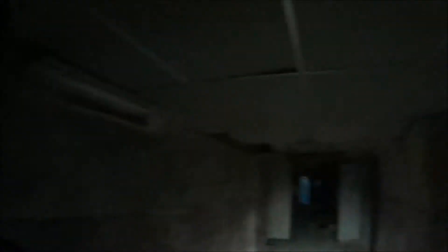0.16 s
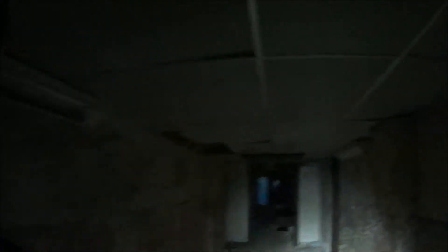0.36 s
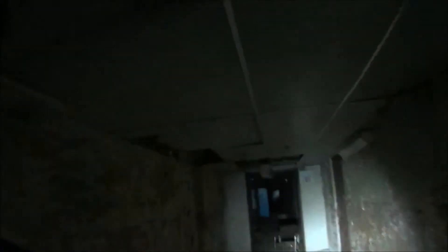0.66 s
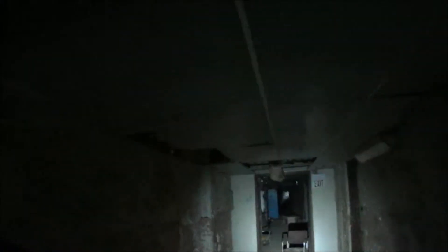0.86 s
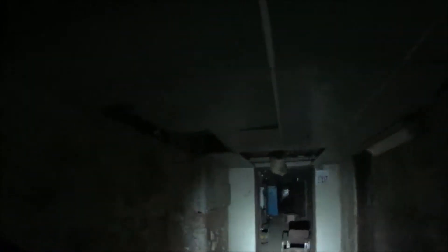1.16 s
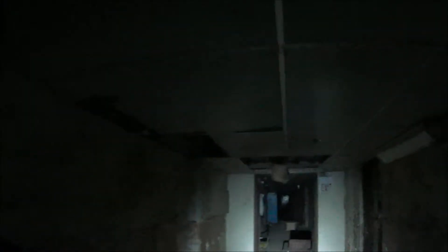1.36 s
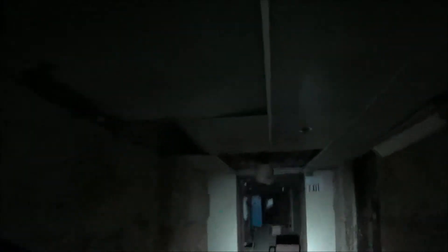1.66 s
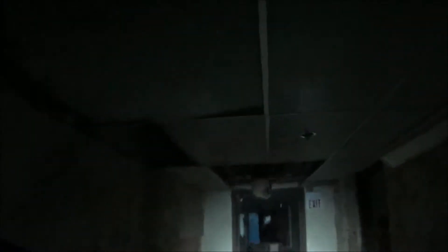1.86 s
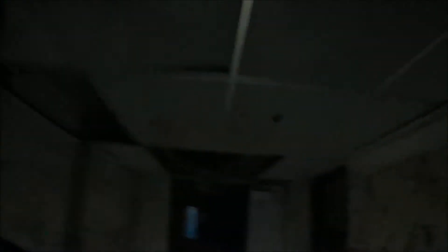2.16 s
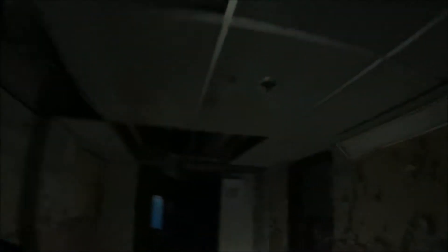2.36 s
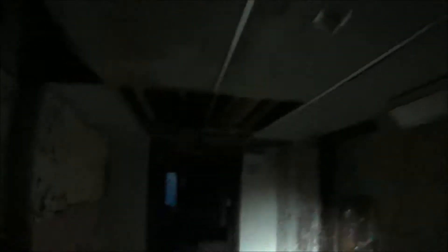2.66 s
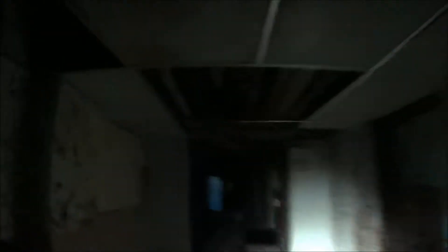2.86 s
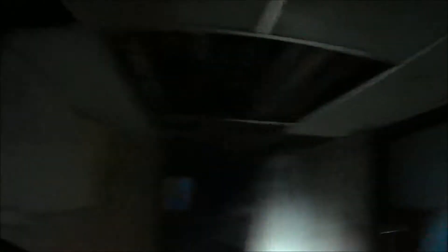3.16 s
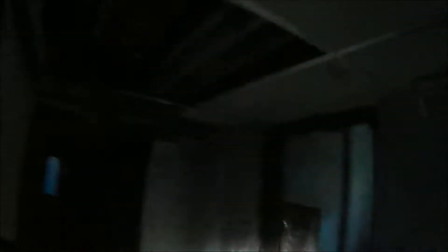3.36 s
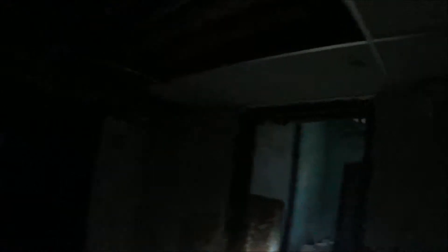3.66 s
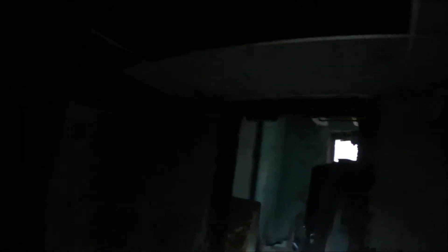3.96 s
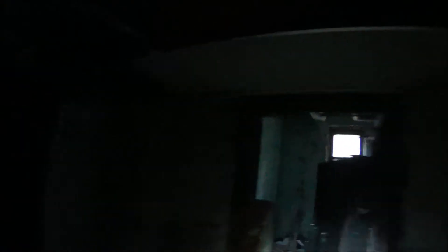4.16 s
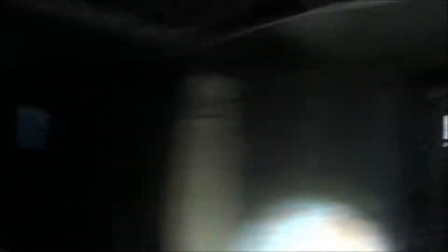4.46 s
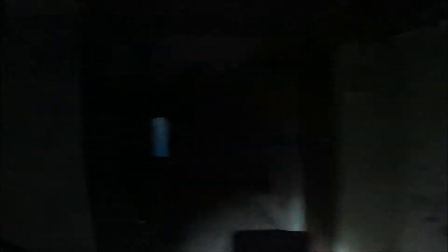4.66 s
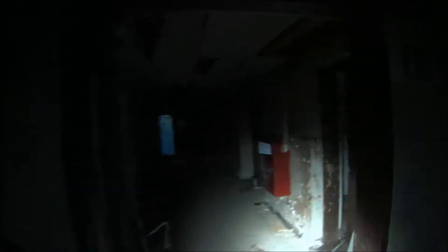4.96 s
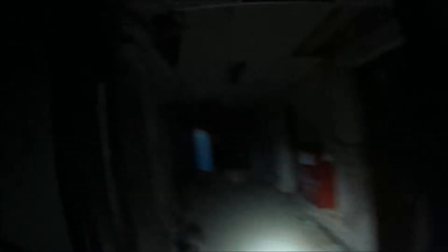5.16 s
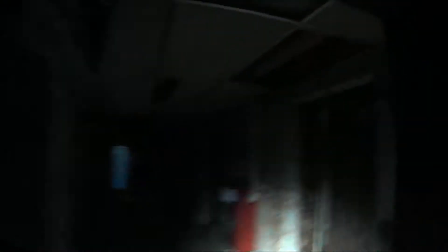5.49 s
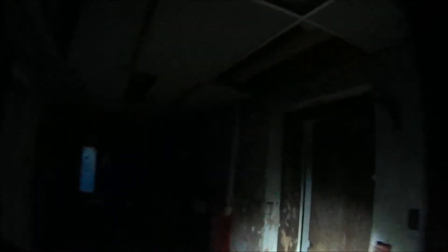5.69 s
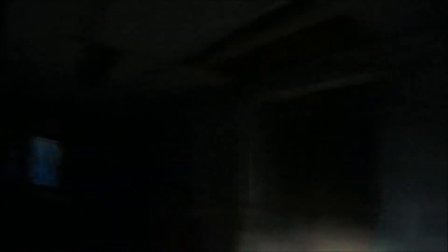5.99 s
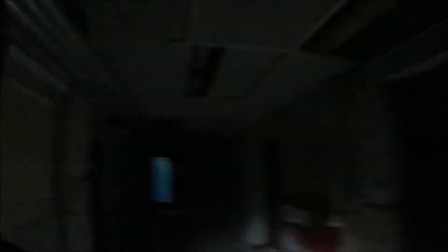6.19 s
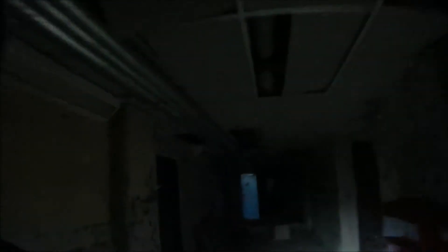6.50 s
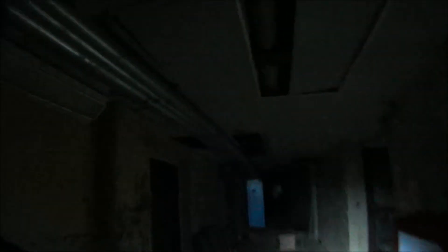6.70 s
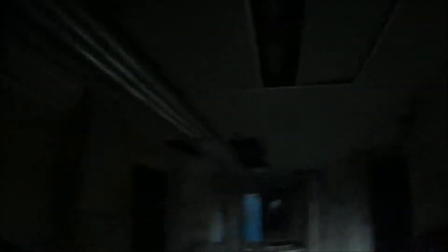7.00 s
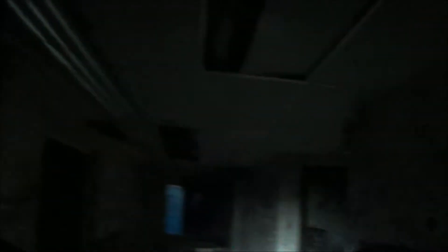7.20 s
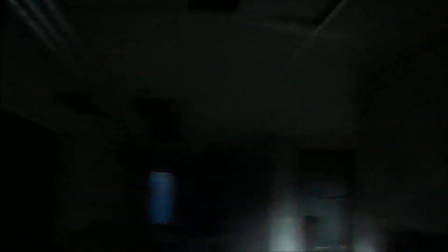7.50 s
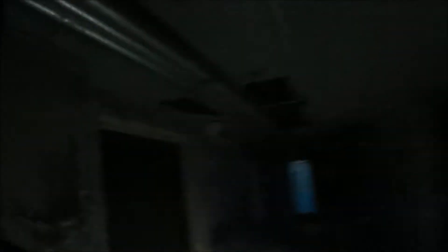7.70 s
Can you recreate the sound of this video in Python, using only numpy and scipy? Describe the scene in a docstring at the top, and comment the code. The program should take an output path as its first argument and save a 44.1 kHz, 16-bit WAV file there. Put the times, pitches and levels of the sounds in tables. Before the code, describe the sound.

Slow footsteps crunch over plaster and grit in an empty corridor, with sharp debris snaps, dull handling thuds and a steady hollow hiss.

```python
"""Empty corridor: footsteps crunch over plaster and grit, heard by a camera in a closed housing.
Debris fractures, ground grit and a tipping shard are bursts of long-tailed noise, spread by wall echoes.
Air sound reaches two microphones through the housing, which rings at a few fixed pitches.
Heel strikes and handling travel through the mount as dull thuds, rubbing and rumble.
Still air and the microphones' own hiss form the steady background."""
import sys
import numpy as np
from scipy import signal
from scipy.fft import rfft, irfft, next_fast_len
from scipy.io import wavfile
from scipy.ndimage import map_coordinates

SR = 44100
rng = np.random.default_rng(int(sys.argv[2]) if len(sys.argv) > 2 else 0)


def output_pcm(signal):
    """Save a mono or channel-first signal as 16-bit PCM at the path in sys.argv[1].

    Samples are clipped to [-1, 1] before scaling.
    """
    pcm = np.clip(np.atleast_2d(signal).T, -1, 1) * 32767
    wavfile.write(sys.argv[1], SR, np.round(pcm).astype(np.int16))


N = 345744  # length [samples]

# Footfalls: t/s, sway level/dB before port gains, grinding delay/s (negative: earlier),
# fine grit level/dB, coarse grit level/dB
FOOTFALLS = [(0.06, -49, -0.022, -28.5, -47), (0.65, -51.5, 0.029, -41.5, -39.5),
             (1.2, -50.5, 0.23, -35.5, -43.5), (1.79, -51, -0.075, -37, -38),
             (2.31, -55.5, -0.074, -34, -41.5), (2.84, -52.5, -0.014, -36, -51),
             (3.41, -57, -0.066, -39, -42.5), (4.0, -55.5, -0.0075, -37.5, -38.5),
             (4.67, -56, 0.0076, -34.5, -54), (5.22, -52, 0.069, -44, -39.5),
             (5.79, -53, 0.077, -44.5, -44.5), (6.4, -54, 0.14, -46, -42.5), (7.03, -56, -.02, -38, -56),
             (7.58, -53.5, 0.14, -53, -54)]


def amp(db):
    """Level law: amplitude ratio of a value in dB."""
    return 10 ** (np.asarray(db) / 20)


def unit(x):
    """Power normalization: x scaled to rms 1."""
    return x / np.sqrt(np.mean(x ** 2) + 1e-20)


def along(points, hz):
    """Logarithmic frequency scale: interpolate (f/Hz, value) points at hz."""
    f, value = np.transpose(points)
    return np.interp(np.log(hz + 1), np.log(f + 1), value)


def curves(rows):
    """Linear interpolation in time: one value per sample for each column after t/s."""
    t, *columns = np.transpose(rows)
    return [np.interp(np.arange(N) / SR, t, column) for column in columns]


def wobble(rate):
    """Slow random modulation: a smooth curve through random knots, rate knots per second."""
    knots = rng.standard_normal(int(N * rate / SR) + 4)
    return map_coordinates(knots, [np.arange(N) * rate / SR])


def filtered(x, response):
    """Linear filtering: the spectrum of x times a real or complex response of frequency."""
    n = x.shape[-1]
    m = next_fast_len(n + 4096)
    return irfft(rfft(x, m) * response(np.fft.rfftfreq(m, 1 / SR)), m)[..., :n]


def causal(x, gain):
    """Minimum phase: folding the cepstrum gives a filter that answers only after the sound."""
    m = 2 * next_fast_len(len(x))
    cepstrum = irfft(np.log(gain(np.fft.rfftfreq(m, 1 / SR))), m)
    folded = cepstrum * np.r_[1, np.full(m // 2 - 1, 2), 1, np.zeros(m // 2 - 1)]
    return irfft(rfft(x, m) * np.exp(rfft(folded)), m)[:len(x)]


def modes(table):
    """Modal superposition: damped resonances (f/Hz, width/Hz, level/dB) summed with alternating sign."""
    def response(f):
        total = 0
        for k, (centre, width, db) in enumerate(table):
            damping = 1j * f * width
            total = total + (-1) ** k * amp(db) * damping / (centre * centre - f * f + damping)
        return total
    return response


def grit(size, spiky_db):
    """Dense tiny fractures: noise whose samples have a long-tailed size, rms 1."""
    return unit(rng.standard_normal(size) * amp(spiky_db * rng.standard_normal(size)))


def swells(times, peaks_db, rise, fall):
    """Exponential growth and decay: a gain that climbs to each peak and sinks after it, in dB/s."""
    late = np.arange(N) / SR - times[:, None]
    slope_db = np.where(late < 0, rise * late, -fall * late)
    return amp(np.max(peaks_db[:, None] + slope_db, axis=0))


def corridor(x, wet_db):
    """Reverberation: direct sound plus two partly alike tails with frequency-dependent decay."""
    # Reverberation time of the corridor: f/Hz, t60/s
    decay_times = [(300, 0.32), (1600, 0.45), (5000, 0.37), (10000, 0.24)]
    hz, t, z = signal.stft(rng.standard_normal((2, SR // 3)), SR, nperseg=256)
    tail = signal.istft(z * amp(-60 * t / along(decay_times, hz)[:, None]), SR, nperseg=256)[1]
    size = tail.shape[1]
    slaps = np.repeat(rng.standard_normal(size // 64 + 1), 64)[:size]
    # early echoes stand apart, later ones merge
    tail = tail * amp(3.8 * slaps * np.exp(-np.arange(size) / SR / 0.06))
    tail[1] = 0.55 * tail[0] + 1.09 * tail[1]  # echoes come partly along the corridor
    tail = np.pad(tail, ((0, 0), (round(.003 * SR), 0)))  # the near walls answer first, after 3 ms
    wet = signal.fftconvolve(x[None], tail / np.linalg.norm(tail[0]), axes=1)
    return amp(wet_db) * wet + np.pad(x, (0, wet.shape[1] - len(x)))


def hiss():
    """Self-noise: independent mid and side noise from the microphones, each with its own spectrum."""
    # Mid and side noise spectra: f/Hz, relative level per Hz/dB
    mid_spectrum = [(25, -5.5), (140, -8), (370, -11.5), (1000, -12), (2500, -17), (6000, -17.5),
                    (11000, -21.5)]
    side_spectrum = [(25, -26), (110, -15), (385, -7.5), (1250, -7), (3500, -15.5), (7000, -20),
                     (11000, -27.5)]
    noise = rng.standard_normal((2, N))
    return filtered(noise, lambda hz: amp([along(mid_spectrum, hz), along(side_spectrum, hz)]) * amp(-41))


def still_air():
    """Diffuse stationary noise: the steady hush of the building."""
    # Spectrum of the still air: f/Hz, relative level per Hz/dB
    air_spectrum = [(100, -2), (500, -25), (1600, 0), (3000, -9), (5000, -11), (10000, -13.5)]
    noise = filtered(rng.standard_normal((2, N)), lambda hz: amp(along(air_spectrum, hz)))
    return amp(-51.0) * unit(noise)


def mount():
    """Structure-borne sound: friction excites the shell modes, and every step sways the mount."""
    # Hand and clothing against the shell: t/s, rubbing level/dB
    rubbing = [(0.0, -64), (0.08, -56.5), (0.45, -67), (0.6, -56.5), (0.75, -60.5), (0.85, -52.5),
               (1.1, -55.5), (1.22, -49.5), (1.45, -60.5), (1.74, -60.5), (1.95, -64.5), (2.6, -68.5),
               (3.1, -62), (3.5, -65), (3.8, -80), (4.05, -61.5), (4.3, -70), (5.1, -65.5), (5.5, -69),
               (5.79, -61.5), (6.2, -73), (6.5, -64), (7.3, -70), (7.58, -64.5), (7.84, -78)]
    # Modes of the rubbed housing wall: f/Hz, width/Hz, level/dB
    shell = [(357, 145, 36), (750, 16, -58)]
    s, sway_db = np.transpose(FOOTFALLS)[:2]
    sway_colour = [(8, -11.5), (22, -1.0), (45, -17.5), (90, -27), (200, -73)]
    sway = filtered(rng.standard_normal((2, N)), lambda hz: amp(along(sway_colour, hz)))
    sway_gain = swells(s, sway_db, rise=98, fall=78) * amp([[2], [-14]])  # mid, side
    rub_db, = curves(rubbing)
    scrape = [[.9, 0.44], [.9, -0.14]] @ rng.standard_normal((2, N))  # partly alike at both ports
    scrape = scrape * amp(2.5 * wobble(35))
    rub = filtered(scrape, lambda hz: modes(shell)(hz) * np.array([[1], [-1j]]))  # side a quarter cycle late
    return sway_gain * unit(sway) + amp(rub_db) * unit(rub)


def thuds():
    """Impact excitation: a jolt rings the mount's low modes, knocks the shell and rattles it."""
    # Jolts: t/s, level/dB, boom level/dB, knock f/Hz, knock t60/s, rattle level/dB;
    # boom and rattle are relative to the jolt, all before port gains
    blows = [(0.056, -25.5, -23.5, 316, 0.011, -16.5), (0.274, -50, 3, 660, 0.012, 9.5),
             (0.3, -44.5, -17, 340, 0.018, -2.5), (0.596, -48, -10, 840, 0.069, 6),
             (0.675, -27, -33, 348, 0.014, -23), (1.161, -46.5, -8, 420, 0.021, 5),
             (1.735, -23.5, -25, 298, 0.011, -16), (1.845, -31.5, -7.5, 200, 0.027, -33),
             (2.632, -32.5, -8.5, 210, 0.021, -31), (2.827, -49.5, -27, 390, 0.023, -14),
             (3.49, -53, -10, 890, 0.031, -15), (4.509, -35, -4, 197, 0.027, -23),
             (5.26, -41.5, -19, 254, 0.015, -13), (6.72, -41, -22, 357, 0.015, -26),
             (6.947, -44, 5, 196, 0.038, -12), (7.593, -40, -16, 259, 0.016, -9)]
    # Low modes of the mount: f/Hz, level/dB, t60/s
    low_modes = [(75.2, 0.5, 0.12), (101, -0.5, 0.086)]
    jolts, t = np.zeros((2, N + SR)), np.arange(SR // 4) / SR
    phase = np.array([[0], [-np.pi / 2]])  # the ports move partly against each other
    soft = (1 - np.exp(-t / 0.0025)) ** 2  # a padded blow builds up
    for s, db, boom_db, knock_hz, t60, rattle_db in blows:
        boom = sum(amp(level - 60 * t / life) * np.sin(2 * np.pi * hz * t + phase)
                   for hz, level, life in low_modes)
        panel = np.sin(2 * np.pi * knock_hz * t + phase)
        panel = panel + 0.7 * np.sin(2 * np.pi * 1.76 * knock_hz * t + phase)
        knock = -amp(-60 * t / np.clip(t60, .005, .2)) * panel
        rattle = unit(filtered(rng.standard_normal((2, len(t))), modes([(720, 410, 0)])))
        rattle = rattle * amp(-60 * t / 0.041)
        # each pair of port gains in dB: mid, side
        blow = amp(boom_db) * amp([[5], [-8]]) * boom
        blow = blow + amp([[13], [7]]) * knock
        blow = blow + amp(rattle_db) * amp([[7], [0.1]]) * rattle
        jolts[:, round(s * SR):][:, :len(t)] += amp(db) * soft * blow
    return jolts[:, :N]


def clinks():
    """Modal ringing: a shard of glass tips over and rattles briefly at its own modes."""
    # Rattles of the shard: t/s, initial level/dB before its resonances
    rattles = [(4.785, -18), (4.826, -18)]
    # Modes of the shard: f/Hz, width/Hz, level/dB
    shard = [(5000, 260, -2), (5900, 140, 0.5), (9140, 170, 0)]
    strikes, t = np.zeros(N), np.arange(SR // 10) / SR
    for s, db in rattles:
        strikes[round(s * SR):][:len(t)] += amp(db - 60 * t / 0.093) * grit(len(t), spiky_db=2)
    return corridor(filtered(strikes, modes(shard)), wet_db=-2.5)[:, :N]


def shuffle():
    """Granular friction: the sole grinds grit in clumps at every step, fine bright and coarse dull."""
    s, _, later, fine_db, coarse_db = np.transpose(FOOTFALLS)
    clumps = amp(5.6 * np.minimum(wobble(40), 1.5))
    fine_colour = [(1500, -49), (2600, 2.5), (6000, 3.0), (10000, 4)]
    coarse_colour = [(300, -10), (1600, -6.5), (2200, -10.5), (3200, -13)]
    fine = filtered(grit(N, spiky_db=6.5), lambda hz: amp(along(fine_colour, hz)))
    coarse = filtered(grit(N, spiky_db=2.0), lambda hz: amp(along(coarse_colour, hz)))
    bright = swells(s + later, fine_db, rise=98, fall=150) * unit(fine)
    dull = swells(s + later, coarse_db, rise=50.4, fall=49) * unit(coarse)
    return corridor(unit(clumps) * (bright + dull), wet_db=0.0)[:, :N]


def snaps():
    """Brittle fracture: load crackle, a sudden break, then a clumpy decaying crunch in its own echoes."""
    # Debris snapping under a shoe: break t/s, treble level/dB, then relative to the treble:
    # body level/dB, dull part level/dB, middle level/dB; crunch t60/s
    breaks = [(0.02, -31.5, 21, 22, 10.5, 0.018), (0.046, -27.5, 8, 6, -1.5, 0.12),
              (0.212, -34, 8, -8, -4, 0.033), (0.269, -17.5, -35, 1, -1.5, 0.024),
              (0.5478, -23, -23, 0, 0, 0.051), (0.599, -25, 18, -9, 0, 0.019),
              (0.69, -33.5, 22, 18.5, -14, 0.015), (0.9775, -24, 7, -0.5, -3.5, 0.064),
              (1.1176, -29, 12, 10, -17, 0.031), (1.1352, -17, 1, -10.5, -6, 0.037),
              (1.1449, -15.5, 5, -0.5, -1, 0.033), (1.1905, -2, 2.5, -2, -10, 0.027),
              (1.2023, 2.5, -11, -7, -28.5, 0.051), (1.2198, -15, 15, -2, -6, 0.086),
              (1.228, -16, -2, 9.5, -2.5, .11), (1.259, -10.5, 11, -3.5, -5.5, 0.049),
              (1.474, -33, 8, -21, 6, 0.028), (1.5025, -28, 5, 1, -1.5, 0.077),
              (1.6774, -33, 12, 20, 10.5, 0.019), (1.699, -27.5, 26.5, 17, 4.5, 0.028),
              (2.093, -29, 6, -11, -1, 0.023), (2.145, -34.5, 2, -6, 11, .027),
              (2.2198, -30, 2, 3, 3, 0.092), (2.6264, -30, 9, -2, -2.5, .027),
              (2.7181, -26, 10, 3.5, 1, 0.084), (2.826, -28.5, 15, -2, 0, 0.034),
              (2.8519, -24, -4, 0.5, 4, 0.024), (2.9176, -26.5, 8, -6, -1.5, 0.029),
              (3.0234, -42.5, 28, 18.5, 2, 0.034), (3.223, -28.5, 21, -12, -9, .03),
              (3.3427, -28, 9, 8, -13, 0.1), (3.379, -18, -4, 5, -2, 0.12),
              (3.3953, 0.5, 12, 1, -5.5, 0.015), (3.4, -8.5, 8, 8, 0, 0.04),
              (3.854, -16, -6, -1, -1.5, 0.019), (4.0707, -15.5, 5, -9.5, -10.5, 0.041),
              (4.3913, -33, 14, -1, -5, 0.076), (4.4837, -29.5, 14, 1.5, -1.5, 0.069),
              (4.5591, -36.5, 19, 6, 0, 0.29), (4.675, -34, 13, 15.5, 2, 0.026),
              (5.096, -18, -8, 8.5, 6, 0.01), (5.1422, -17.5, 11, 1, 0.5, 0.026),
              (5.215, -26, 16, 5, 1, 0.026), (5.2605, -37.5, 26.5, 10, 10, 0.044),
              (5.2908, -21.5, -6, 2.5, 0.5, 0.02), (5.323, -24, -14, -2, 2, 0.041),
              (5.4774, -23, -1, -1, 1.5, 0.037), (5.5859, -32, -4, -13, 4, 0.038),
              (5.732, -22.5, 15.5, -2.5, -4, 0.071), (5.8804, -35.5, 15, 8, 9, 0.025),
              (6.064, -34, 5, 0, -3, 0.045), (6.244, -12.5, 1, -1, -1.5, 0.028),
              (6.3095, -28.5, -4, 3, -6, 0.039), (6.3264, -18.5, 2, -14, -2, 0.021),
              (6.4282, -31, 21, 6, 4.5, 0.024), (6.4813, -20.5, 15.5, 17.5, 0, 0.015),
              (6.571, -29, 7, 4, 3, 0.048), (6.9391, -34.5, 23, 2, -2, 0.053),
              (6.985, -23, 1, 3.5, 0, 0.031), (7.4992, -35, 4, 0, -9, 0.08), (7.5384, -34, 8, 0, 0, 0.041),
              (7.5789, -34, -5, 7, 0, 0.069)]
    loading = .016  # from first load to break [s]
    break_share = 0.57  # size of the single break pulse over the root energy of the crunch
    out, t = np.zeros((2, N + SR)), np.arange(SR // 8) / SR - loading
    for s, db, body_db, dull_db, middle_db, t60 in breaks:
        # the piece crackles under load before it breaks; heavier breaks crackle more
        creak = amp(-2.5 + 0.03 * db) * np.exp(t / 0.0029)
        crack = 0.27 * np.exp(-np.abs(t) / 0.00082)  # splinters right after the break
        crunch = amp(-60 * t / np.clip(t60, .003, .3))
        shape = np.where(t < 0, creak, crack + crunch)
        pieces = np.repeat(rng.standard_normal(len(t) // 100 + 1), 100)[:len(t)]
        clumps = amp(4 * pieces)  # pieces give way one by one
        burst = unit(clumps * grit(len(t), spiky_db=2.0) * shape) * np.sqrt(np.mean(shape ** 2))
        burst[round(loading * SR)] += break_share * np.linalg.norm(burst)  # the piece lets go at one instant
        # the top octave falls with the dull part and rises with the middle
        top_db = -1.5 - 0.35 * dull_db + 0.16 * middle_db
        colour = [(150, body_db - 26), (700, body_db), (1250, (body_db + dull_db) / 2 - 4),
                  (1600, dull_db), (2200, middle_db - 1.5), (3000, middle_db), (5300, 0), (9000, top_db)]
        heard = corridor(causal(burst, lambda hz: amp(db + along(colour, hz))), wet_db=1.5)
        out[:, round((s - loading) * SR):][:, :heard.shape[1]] += heard
    return out[:, :N]


def housing(air):
    """Cavity resonance: in-step and opposed pressure at the ports each excite their own modes."""
    # Air cavity modes, in step at both ports and opposed: f/Hz, width/Hz, level/dB
    in_step = [(615, 2000, -33), (1420, 770, -22), (1590.4, 172, 1), (3152, 517, -11), (4857, 456, -9),
               (6020, 1230, -16.5), (7340, 580, -14), (9590, 1240, -26)]
    opposed = [(650, 1400, -37), (1250, 230, -27), (1560, 170, -12), (2920, 330, -6), (4400, 920, -13.5),
               (5700, 2700, -19), (7020, 1100, -16.5), (9000, 1100, -25.5)]
    lag = np.exp(-1j * 0.83)  # a pressure gradient lags by part of a cycle [0.83 rad]
    return filtered(air, lambda hz: np.array([modes(in_step)(hz), lag * modes(opposed)(hz)]))


def scene():
    """Superposition: airborne and structure-borne mid and side pressure, turned into left and right."""
    air = still_air() + clinks() + shuffle() + snaps()
    mid, side = mount() + thuds() + housing(air)
    return np.array([mid + side, mid - side])


def record(dry):
    """Band limitation: microphone hiss is added and nothing is kept from 11130 Hz upward."""
    mid, side = hiss()
    return filtered(dry + [mid + side, mid - side], lambda hz: hz < 11130)


dry = scene()
out = record(dry)
output_pcm(out)
```